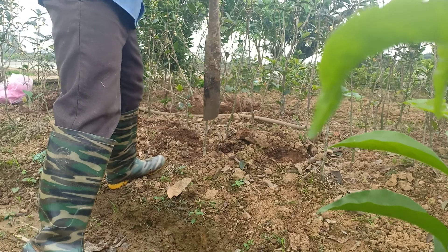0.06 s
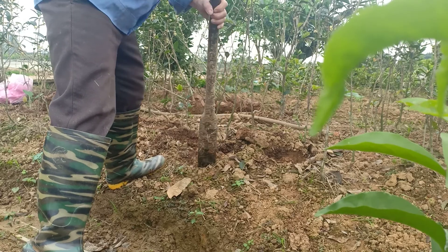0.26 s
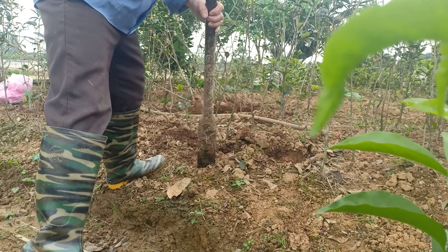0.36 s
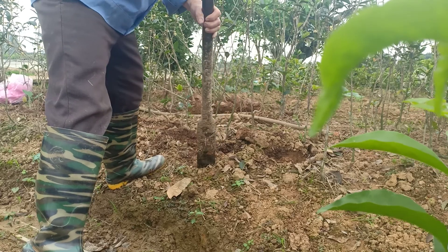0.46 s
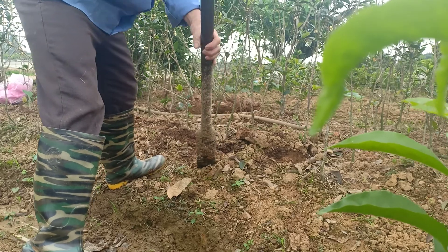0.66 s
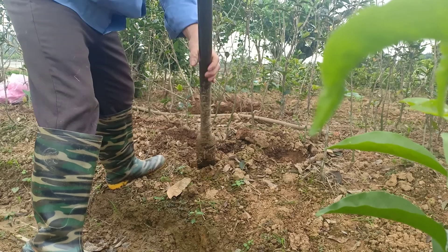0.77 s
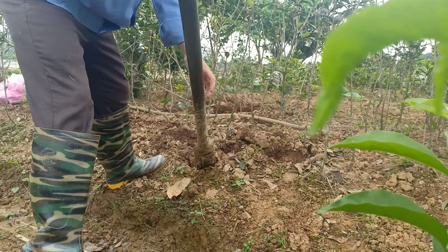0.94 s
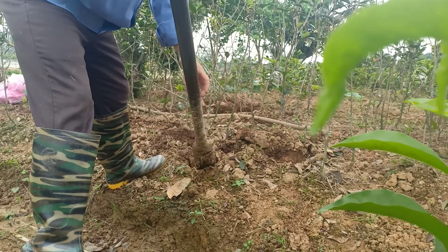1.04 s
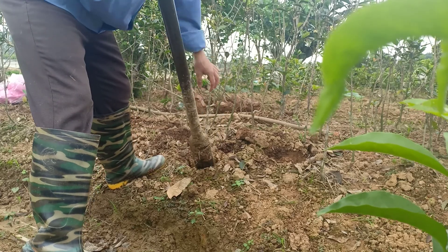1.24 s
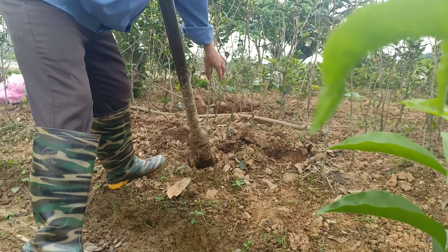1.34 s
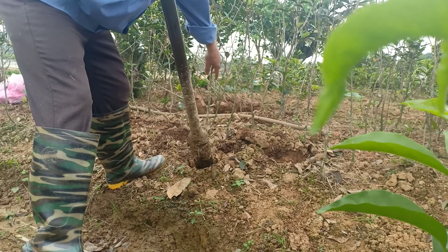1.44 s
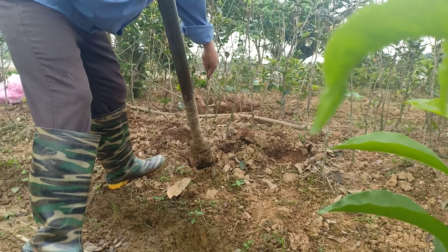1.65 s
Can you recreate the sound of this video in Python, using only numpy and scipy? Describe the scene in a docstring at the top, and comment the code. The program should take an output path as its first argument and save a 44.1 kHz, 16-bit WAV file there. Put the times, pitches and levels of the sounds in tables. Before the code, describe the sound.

A spade rams into stony soil close by, hitting a stone with one sharp crack and a thud. Pebbles click and scrape on the blade, then earth shifts softly and clothes rustle over faint outdoor air.

```python
"""Spade in stony soil

A long-handled narrow spade is rammed in: it grazes loose grit, cracks against a stone and stops with
a thud, the steel ringing. As the blade is levered, pebbles click and scrape along it, clods shift and
clothes rustle. Far off an engine hums and birds call faintly. Hits are damped resonances, grit and
earth are showers of tiny impacts, cloth and air are shaped noise."""
import sys
import numpy as np
from scipy import signal
from scipy.fft import rfft, irfft
from scipy.io import wavfile

SR = 44100
rng = np.random.default_rng(int(sys.argv[2]) if len(sys.argv) > 2 else 0)


def wrap_up_sound(samples):
    """Save the sound to the file named by the first command line argument, as 16-bit audio."""
    columns = np.atleast_2d(samples).T
    # keep every value between -1 and 1, then stretch to whole-number steps
    tamed = np.clip(columns, -1, 1)
    steps = np.round(tamed * 32767).astype(np.int16)
    wavfile.write(sys.argv[1], SR, steps)


N = 74970
TIME = np.arange(N) / SR

# tone of the outdoor air: frequency_hz, gain_db
AIR_EQ = [(20, -37), (40, -16), (70, 0.5), (100, 1.5), (160, 1), (240, -8), (430, -7.5), (770, -13),
          (1200, -18), (1600, -16), (2400, -10), (3600, -25), (5900, -21.5), (7500, -36.5), (9700, -39.5),
          (13600, -40.5), (15500, -39)]
# stereo width of air, cloth and earth: frequency_hz, side_against_mid_db
SOFT_WIDTH = [(60, -23), (200, -10), (400, -6.5), (750, -1), (1300, 4.5), (2400, -2.5), (4400, 1.5),
              (15000, -1)]
# partials of the distant engine: harmonic_number, level_db
ENGINE_HARMONICS = [(1, -59.5), (2, -64.5), (3, -70), (4, -75), (5, -73)]
# far-off bird calls: start_s, length_s, from_hz, to_hz, level_db
BIRD_CALLS = [(1.333, 0.035, 335, 315, -48.5), (1.377, 0.034, 790, 836, -51), (1.395, 0.047, 305, 284, -51),
              (1.393, 0.033, 1076, 1033, -58), (1.412, .058, 5300, 3510, -60.5),
              (1.469, 0.036, 3200, 4400, -65)]
# envelope of rustling sleeves and trousers: time_s, level_db
RUSTLE_ENVELOPE = [(0, -91), (.16, -76), (.21, -60.5), (.33, -69.5), (.48, -59), (.52, -76), (.62, -67.5),
                   (.72, -65), (.76, -58), (.81, -62.5), (.86, -59.5), (.885, -68.5), (.96, -64),
                   (1.1, -73.5), (1.25, -75.5), (1.4, -66.5), (1.53, -68), (1.62, -61), (1.7, -63)]
# tone of the cloth: frequency_hz, gain_db
CLOTH_EQ = [(200, -11), (600, 3.5), (1300, -9.5), (2700, 4), (4000, -6.5), (5800, 3.5), (7500, -13.5),
            (9700, -16), (13500, -8.5), (15500, -11.5)]
# loose earth gives way: start_s, attack_s, t60_s, level_db
EARTH_CRUMBLES = [(0.246, .003, 0.07, -41.5), (0.385, 0.021, 0.17, -58.5), (0.68, .07, 0.47, -56.5),
                  (0.825, 0.033, 0.096, -50.5), (1.0, 0.0044, .15, -59.5), (1.075, 0.0088, 0.096, -54),
                  (1.232, 0.0059, 0.12, -53.5), (1.37, 0.033, 0.55, -58.5), (1.546, 0.0028, 0.033, -51.5)]
# dull tone of that earth: frequency_hz, gain_db
EARTH_EQ = [(100, -6.5), (250, -3), (420, 2.5), (620, -2.5), (950, -6.5), (1400, -20.5), (3000, -21.5),
            (8000, -46)]
# grit grinds along the blade: start_s, attack_s, t60_s, level_db, sparkle_against_crunch_db
GRIT_SCRAPES = [(0.216, 0.0026, 0.056, -33.5, -9.5), (0.2432, 0.0035, 0.023, -23, 0),
                (0.256, .004, 0.092, -46.5, 2), (0.28, 0.03, 0.87, -58.5, -0.5),
                (0.404, 0.00076, 0.072, -46, 0), (0.443, .001, 0.05, -46, -1),
                (0.4617, 0.0067, .04, -44.5, -0.5), (0.477, 0.0021, 0.045, -41.5, 3.5),
                (0.488, .001, 0.053, -48, 7), (0.109, 0.0032, 0.14, -56, -17), (0.74, 0.011, .15, -57, -8),
                (0.836, 0.022, 0.045, -63, -4), (1.001, .0015, 0.052, -53, -16),
                (1.17, 0.014, 0.21, -59.5, -21), (1.245, 0.025, 0.072, -55.5, -8.5),
                (1.5457, 0.00059, 0.041, -43, -3), (1.619, 0.0031, 0.07, -56, -3.5)]
# tone of coarse grit on steel: frequency_hz, gain_db
CRUNCH_EQ = [(100, -41), (500, -14.5), (780, -24.5), (980, -10), (1130, -22), (1300, -8.5), (1450, -5.5),
             (1750, -7), (2000, -0.5), (2250, -2), (2650, 0), (2950, -10), (3200, -10.5), (3800, -11.5),
             (5000, -22.5), (15500, -58.5)]
# tone of fine grit on steel: frequency_hz, gain_db
SPARKLE_EQ = [(1000, -25), (3000, -15), (3800, -3), (4400, -10.5), (5200, 2.5), (6100, -5.5), (7000, -13.5),
              (8300, -15.5), (9500, -40), (11300, -20.5), (15500, -20.5)]
# stereo width of the grit: frequency_hz, side_against_mid_db
GRIT_WIDTH = [(200, -16), (1200, -9), (2300, -12), (4400, -2), (12000, 0.5)]
# the free steel sings after a knock: start_s, level_db
STEEL_RINGS = [(0.26, -51), (0.47, -55.5), (0.508, -62.5), (1.24, -63), (1.268, -62)]
# modes of the blade, damped by the soil: pitch_hz, level_against_hit_db, t60_s
BLADE_MODES = [(953, -29, 0.036), (1258, -34, 0.048), (1560, -32, .03), (1750, -24.5, 0.029),
               (2210, -13.5, 0.029), (2530, -19.5, 0.023), (3130, -40, 0.058), (3580, -37, 0.031),
               (4210, -32, 0.025), (4770, -38, 0.04), (5180, -39, 0.037), (5820, -39, 0.049),
               (6210, -45, .05)]
# pebbles click on the blade: start_s, level_db, treble_against_low_db
PEBBLE_CLICKS = [(0.4052, -40, 7), (0.4432, -32, 1.5), (0.4674, -25.5, -3.5), (0.4795, -26, -2.5),
                 (0.4895, -45, 3), (0.4942, -40, 3), (1.0005, -41.5, -3.5), (1.5471, -40, 4),
                 (1.5495, -57.5, -1)]
# the ground takes the blow, later clods shift: start_s, pitch_hz, rise_s, level_db
GROUND_THUDS = [(0.246, 545, 0.0051, -32), (0.2444, 300, .006, -30.5), (0.249, 161.5, 0.01, -29),
                (0.254, 96, 0.0094, -36), (0.834, 298, 0.0068, -46.5), (0.853, 416, 0.0062, -35),
                (1.232, 237, .01, -45.5)]
# the blade meets the stone: start_s, pitch_hz, rise_s, level_db
STONE_CRACKS = [(0.2448, 3030, 0.00058, -17), (0.2455, 5270, 0.00044, -6.5), (0.24680, 2320, 0.00077, -0.6),
                (0.2471, 1574, 0.00103, -33), (0.2472, 5170, 0.00073, -13)]


def from_db(db):
    """Decibels to gain."""
    return 10 ** (np.asarray(db) / 20)


def pan(db):
    """Left and right gains for a level difference; negative leans right."""
    return from_db(np.array([[db], [-db]]) / 2)


def drift(rate_hz):
    """Random modulator gliding between values of spread 1."""
    knots = rng.standard_normal(int(rate_hz * N / SR) + 3)
    return np.interp(TIME * rate_hz, np.arange(len(knots)), knots)


def eq_curve(points):
    """Gain at every FFT bin from (frequency_hz, gain_db) points."""
    hz, db = np.transpose(points)
    bin_hz = np.arange(N + 1) * SR / (2 * N)
    return from_db(np.interp(np.log(bin_hz + 1), np.log(hz), db))


def colour(x, gain):
    """Minimum-phase EQ, so nothing rings ahead of a transient."""
    cepstrum = irfft(np.log(gain))
    cepstrum[1:N] *= 2
    cepstrum[N + 1:] = 0
    return irfft(rfft(x, 2 * N) * np.exp(rfft(cepstrum)))[:N]


def stereo(pair, eq, width):
    """Colours two signals as mid and side, keeping the power of the mid; returns left and right."""
    gain = eq_curve(eq)
    gain = gain / np.sqrt(np.mean(gain ** 2))
    mid = colour(pair[0], gain)
    side = colour(pair[1], gain * eq_curve(width))
    return np.array([mid + side, mid - side])


def shower(pushes, grains_per_s=7800, spread_db=4):
    """Each push releases a dying shower of tiny grain impacts; returns mid and side."""
    power = 0
    for start, attack, t60, db in pushes:
        t = TIME - start
        envelope = np.clip(t / attack, 0, 1) * from_db(db - 60 * np.maximum(t - attack, 0) / t60)
        power += envelope ** 2
    impacts = rng.random(N) < grains_per_s / SR
    grains = impacts * from_db(spread_db * np.minimum(rng.exponential(1, N), 4))
    return grains / grains.std() * rng.choice([-1, 1], (2, N)) * np.sqrt(power)


def ping(start, hz, rise, db, left_lag_s=0.000017):
    """A heavily damped resonance that swells and dies in a few cycles, reaching the right side first."""
    t = np.maximum(TIME - start - np.array([[left_lag_s], [0]]), 0)
    envelope = (t / rise * np.exp(1 - t / rise)) ** 6
    return from_db(db) * envelope * np.sin(2 * np.pi * hz * t)


def air(level_db=-56.5, flutter_db=0.67):
    """A bed of outdoor air: bass-heavy noise with a slight flutter."""
    noise = rng.standard_normal((2, N)) * from_db(level_db + flutter_db * drift(25.25))
    return stereo(noise, AIR_EQ, SOFT_WIDTH)


def engine(pitch_hz=58.8, wander=0.03516, waver_db=1.6):
    """A distant engine hums: the pitch wanders and each harmonic wavers in level."""
    phase = 2 * np.pi * np.cumsum(pitch_hz * (1 + wander * drift(7.98))) / SR
    return sum(np.sqrt(2) * from_db(db + waver_db * drift(7.8)) * np.cos(k * phase)
               for k, db in ENGINE_HARMONICS)


def birds(jitter=0.0422):
    """Faint bird calls: short glides with a rough edge to the pitch."""
    out = 0
    for start, length, from_hz, to_hz, db in BIRD_CALLS:
        progress = np.clip((TIME - start) / length, 0, 1)
        hz = (from_hz + (to_hz - from_hz) * progress) * (1 + jitter * drift(300))
        out += from_db(db) * np.sin(np.pi * progress) * np.sin(2 * np.pi * np.cumsum(hz) / SR)
    return out


def clothes(flutter_db=2.2):
    """Cloth hisses as the digger shifts grip and leans."""
    level = from_db(np.interp(TIME, *np.transpose(RUSTLE_ENVELOPE)) + flutter_db * drift(90))
    return stereo(rng.standard_normal((2, N)) * level, CLOTH_EQ, SOFT_WIDTH)


def earth():
    """Loose earth crumbles under blade and boots."""
    return stereo(shower(EARTH_CRUMBLES), EARTH_EQ, SOFT_WIDTH)


def grit():
    """Coarse grit crunches on the steel, with fine grit sparkling on top."""
    coarse = shower([row[:-1] for row in GRIT_SCRAPES])
    fine = shower([(*timing, db + sparkle_db) for *timing, db, sparkle_db in GRIT_SCRAPES])
    return stereo(coarse, CRUNCH_EQ, GRIT_WIDTH) + stereo(fine, SPARKLE_EQ, GRIT_WIDTH)


def singing_steel(pitch_hz=5820, t60_s=0.26, rough_db=3.5):
    """One high, lightly damped mode lingers, shimmering differently left and right."""
    envelope = sum((TIME > start) * from_db(db - 60 * np.maximum(TIME - start, 0) / t60_s)
                   for start, db in STEEL_RINGS)
    channels = []
    for _ in range(2):
        shimmer = from_db(rough_db * drift(120))
        phase = 2 * np.pi * pitch_hz * TIME + 0.5 * drift(81.7)
        channels.append(envelope * shimmer * np.sin(phase))
    return np.array(channels)


def blade_ring(swell_s=0.0016):
    """The hardest crack and each pebble set the steel ringing; the soil chokes it quickly."""
    crack_start, _, rise, crack_db = max(STONE_CRACKS, key=lambda row: row[-1])
    hits = [(crack_start + rise, crack_db)] + [row[:2] for row in PEBBLE_CLICKS]
    out = 0
    for start, hit_db in hits:
        t = np.maximum(TIME - start, 0)
        swell = 1 - np.exp(-t / swell_s)
        for k, (hz, mode_db, t60) in enumerate(BLADE_MODES):
            envelope = swell * from_db(hit_db + mode_db - 60 * t / t60)
            out += (-1) ** k * envelope * np.sin(2 * np.pi * hz * t)  # modes alternate in polarity
    return out * pan(db=-6)


def pebbles(low_hz=2210, treble_hz=5100, rise_s=0.00059):
    """Each pebble clicks on the blade: a low ping and a treble ping half as long."""
    return sum(ping(start, low_hz, rise_s, db) + ping(start, treble_hz, rise_s / 2, db + treble_db)
               for start, db, treble_db in PEBBLE_CLICKS)


def thuds():
    """The low body: the ground takes the blow, and clods shift later."""
    return sum(ping(*thud) for thud in GROUND_THUDS)


def stone_crack():
    """Steel meets stone: a tight cluster of bright pings, heard as one crack."""
    return sum(ping(*crack) for crack in STONE_CRACKS)


def scene():
    """The spade close up, over the digger's clothes and the garden; both layers lean right."""
    spade = stone_crack() + thuds() + pebbles() + blade_ring() + singing_steel() + grit() + earth()
    background = clothes() + air() + engine() + birds()
    return spade * pan(db=-1.05) + background * pan(db=-1.5)


def record(dry):
    """Clips at full scale, then cuts the very top with a steep low-pass."""
    cutoff_hz = 16900
    lowpass = signal.cheby2(16, 70, cutoff_hz, fs=SR, output="sos")
    return signal.sosfilt(lowpass, np.clip(dry, -1, 1))


dry = scene()
out = record(dry)
wrap_up_sound(out)
```